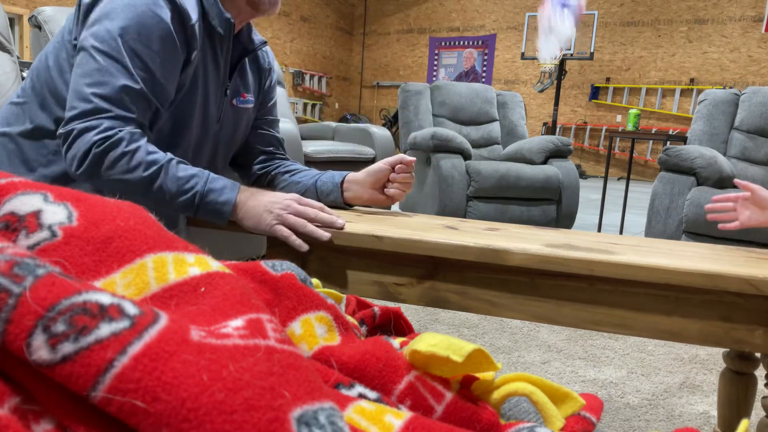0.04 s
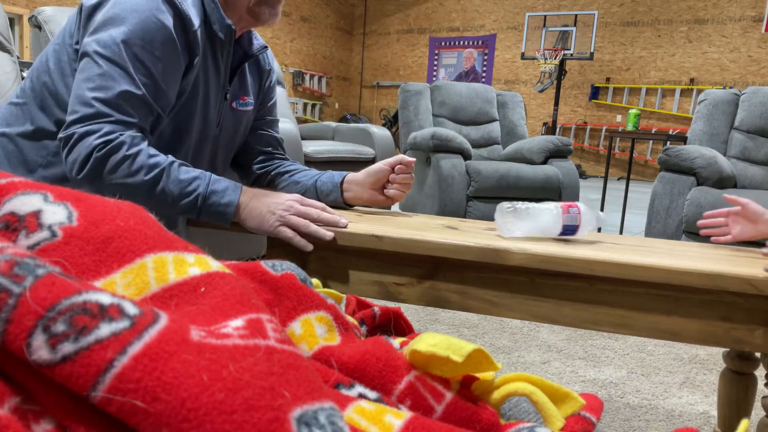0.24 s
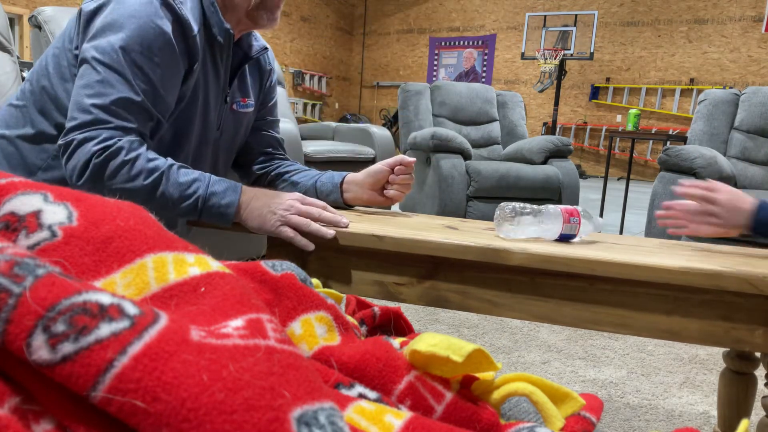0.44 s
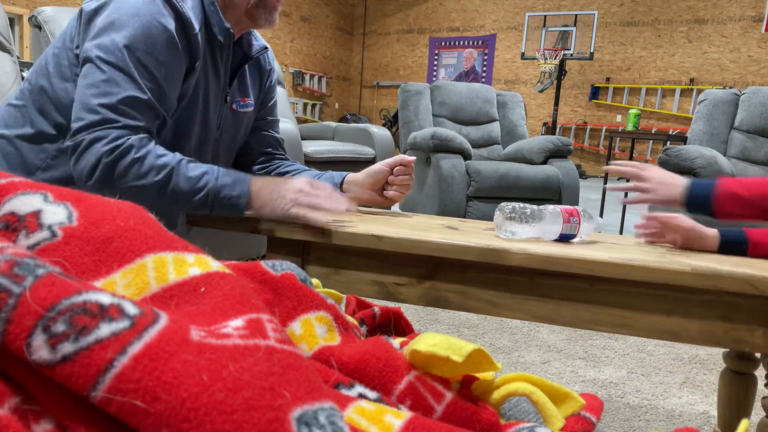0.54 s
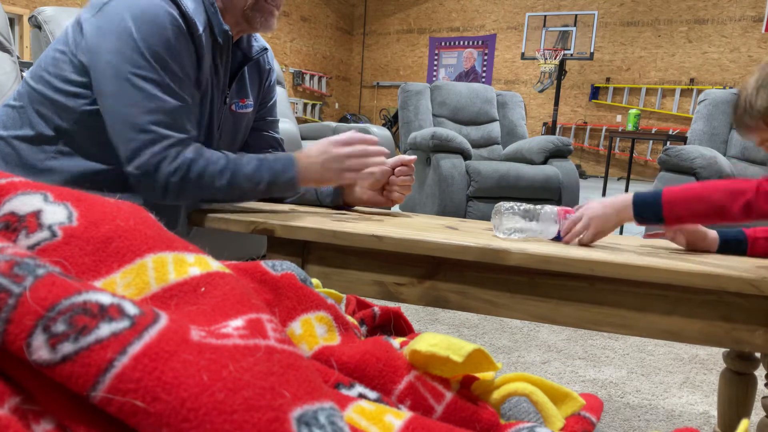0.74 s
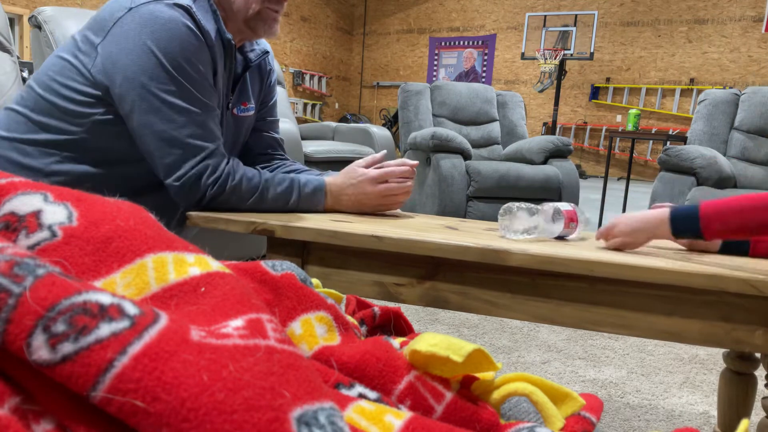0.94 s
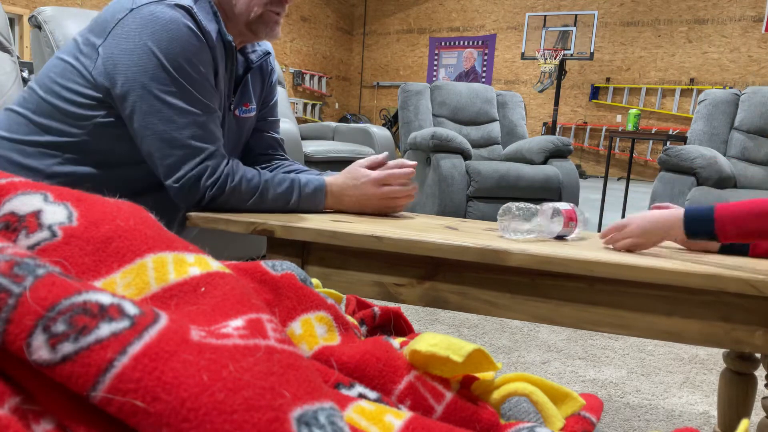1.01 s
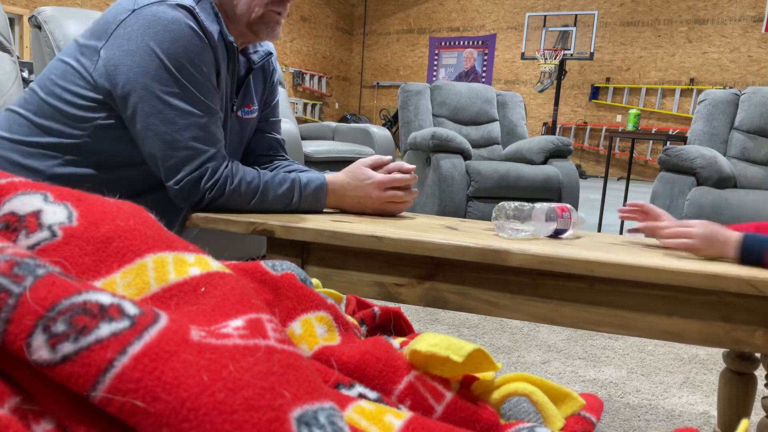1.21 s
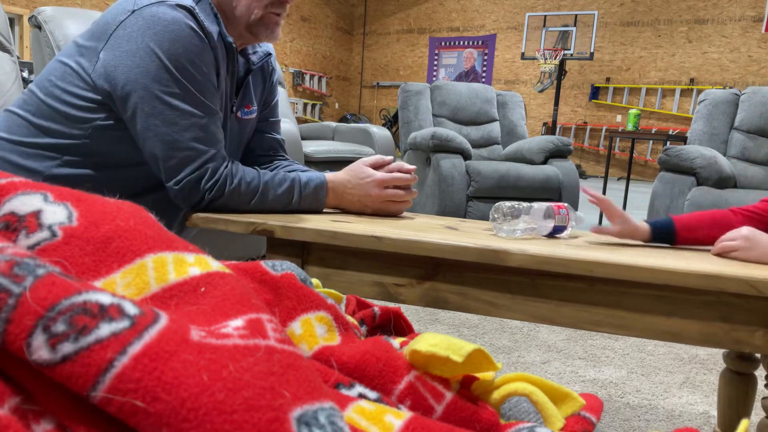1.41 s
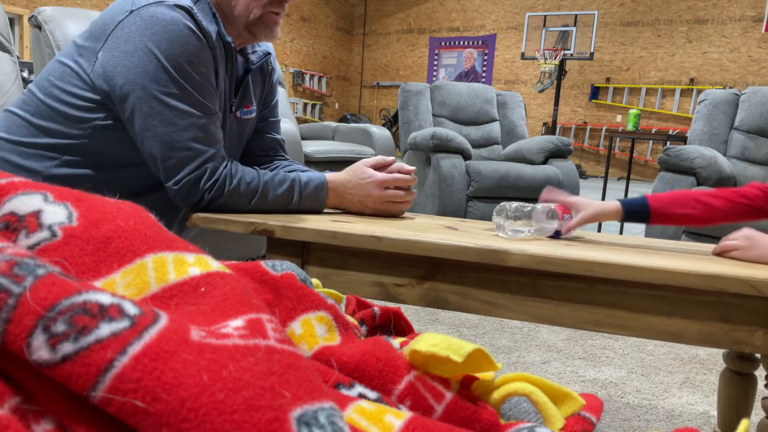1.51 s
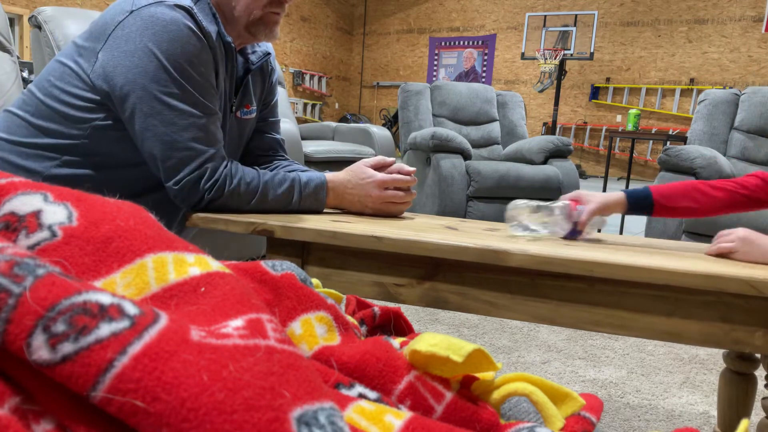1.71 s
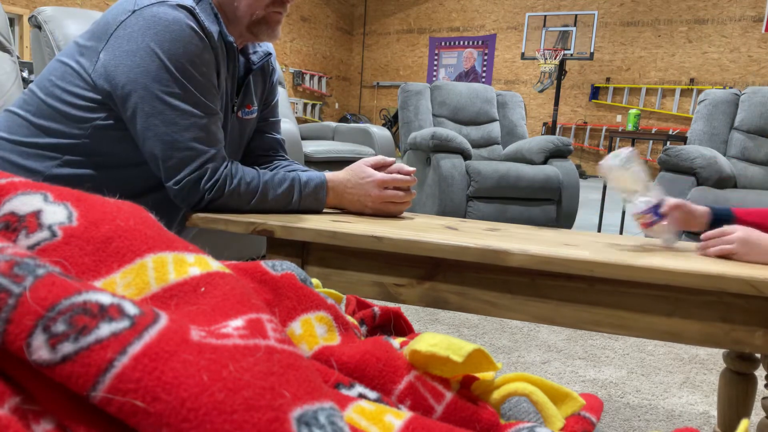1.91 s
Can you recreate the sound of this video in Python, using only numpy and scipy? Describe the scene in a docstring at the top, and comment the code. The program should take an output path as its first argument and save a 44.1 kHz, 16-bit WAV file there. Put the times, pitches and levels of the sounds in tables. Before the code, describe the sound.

A thin plastic bottle lands on a wooden table with a sharp hollow knock at 0.24 seconds, echoing through a large hard-walled room. A soft hand thud comes at 0.6, light crackles from 0.78 to 0.85, and a bright clack at 0.92. A small click with a faint thud follows at 1.26, then quick gripping crackles from 1.65 to 1.75 and faint ticks near 1.94, over quiet hush.

```python
"""Plastic bottle on a wooden table

A thin plastic bottle lands on its side on a wooden table in a large, hard-walled room, a couple of metres
from a phone. A hand then grips it, sets it down and picks it up: the shell crackles and knocks.
Each contact rings decaying modes of shell, body, hollow and table top; soft hand thuds ring low modes.
Walls answer with clear echoes and a long tail of shaped noise, over a quiet steady hush."""
import sys
import numpy as np
from scipy import signal
from scipy.fft import rfft, irfft
from scipy.io import wavfile
from scipy.ndimage import uniform_filter1d

SR = 44100
rng = np.random.default_rng(int(sys.argv[2]) if len(sys.argv) > 2 else 0)


def master_out(mix):
    """Clip the mix to full scale and print it as 16-bit PCM to the path in sys.argv[1]."""
    frames = np.transpose(np.atleast_2d(mix))
    ceiling = np.clip(frames, -1, 1)
    pcm = np.round(ceiling * 32767).astype(np.int16)
    wavfile.write(sys.argv[1], SR, pcm)


def boost(x):
    """Linear amplitude factor 10**(x/20) for a level x in decibels (scalar or array-like)."""
    u = np.asarray(x, float) / 20
    return 10 ** u


N = 85995
LEAD = SR // 2  # samples computed ahead of the start, so that an earlier crackle can leave its tail

# Quiet hush of the room. Each row: frequency in Hz, relative spectral level in dB.
AIR_SPECTRUM = [(24, -17.5), (45, 8), (80, 7.5), (170, -5), (600, -6.5), (1500, -7), (4500, -12.5),
                (10000, -22), (16000, -35)]
# Diffuse room tail. Each row: frequency in Hz, 60 dB decay time in s, relative level in dB.
TAIL = [(86, 1.77, -14.5), (161, 1.5, -5), (335, 1.41, -0.5), (580, 1.81, -1), (1110, 2.02, -4),
        (2000, 1.58, -1), (3140, 1.41, 2.5), (4850, 1.18, 3), (8000, 0.81, 2.5), (10900, 0.67, -4),
        (15000, 0.57, 4.5), (16300, .4, -8)]
# Standing waves of the room: faint decaying tones within the tail.
# Each row: frequency in Hz, relative level in dB, 60 dB decay time in s.
STANDING_WAVES = [(396.4, -21, .8), (401, -23, .8), (209, -24, .9), (1015, -27, 1.2)]
# Wall echoes. Each row: delay in s, level before the echo band-pass in dB, smear in s.
ECHOES = [(.0102, -17, .001), (.0244, -7, .002), (.054, -15, .001), (.081, -15, .0015)]
# Soft thuds of a hand on the table. Each row: start in s, level in dB, pitch in Hz, 60 dB decay time in s.
HAND_THUDS = [(0.614, -34, 134.8, 0.082), (1.262, -45, 110, 0.073), (1.563, -55, 104.7, 0.49)]
# Modes of the table top. Each row: frequency in Hz, relative level in dB, 60 dB decay time in s.
TABLE_TOP = [(101.3, -13, 0.099), (126.7, -13, 0.067), (211.5, -14, 0.15), (399, -1.5, 0.066),
             (447, 2.5, 0.034), (313, -6.5, 0.037), (560, -8, 0.053)]
# Modes of the hollow knock. Each row: multiple of the knock pitch, relative level in dB, 60 dB decay time in s.
KNOCK = [(.8, -6, 0.011), (0.998, -1.5, 0.018), (1.242, -8, 0.011)]
# Modes of the bottle body. Each row: multiple of the body pitch, relative level in dB, 60 dB decay time in s.
BODY = [(.84, -3.5, 0.0063), (1, 2, 0.0087), (1.16, -7, 0.0048), (1.42, -7, 0.0035), (1.7, -12.5, 0.0054)]
# Modes of the thin shell. Each row: frequency in Hz, relative level in dB, 60 dB decay time in s.
SHELL = [(3500, -8, .004), (4150, -7, .004), (4800, -4, .0045), (5900, -4, .0035), (6900, -3, .0035),
         (7800, -2, .004), (8700, -2, .004), (9700, -1, .0045), (10600, -2, .004), (11800, -4, .003),
         (13100, -7, .003), (14600, -9, .003), (15800, -12, .002)]
# Contacts of the bottle; grip and tilt shift the last two columns. Each row: start in s, shell treble level
# in dB, body level in dB, knock level in dB, table top level in dB, buckling length in s (at least 0.1 ms
# is used), brightest pitch in Hz, energy to the room over that to the phone in dB, body pitch in Hz,
# knock pitch in Hz.
CONTACTS = [(.2367, -17, -20.5, -13.5, -14, 0.0056, 8440, 0, 2096, 992),
            (.2403, -23.5, -24.5, -26, -58, 0.01, 9700, -10, 1750, 910),
            (.7827, -26.5, -41.5, -43, -70, 0.0077, 12400, 1.5, 2050, 1100),
            (.8036, -31, -36, -43, -60, 0.0045, 6040, -6, 2270, 1100),
            (.8238, -33, -38.5, -46.5, -48, 0.0043, 8000, -16, 1820, 1310),
            (.8537, -29.5, -39.5, -57, -63, 0.0033, 7200, 3, 2470, 940),
            (.9152, -15, -22, -27, -31, 0.0029, 10100, -2.5, 2026, 1090),
            (1.256, -37, -43, -45, -49, 0.0062, 6100, -3.5, 2000, 1000),
            (1.2607, -21.5, -29, -42, -60, 0.00043, 8900, -2, 1950, 946),
            (1.2628, -26.5, -37, -57, -53, 0.002, 4700, -3.5, 2400, 970),
            (1.6483, -25.5, -41.5, -71, -72, 0.00055, 8250, -18, 1930, 810),
            (1.65, -24.5, -38.5, -52, -62.5, 0.0015, 9200, 3, 2500, 803),
            (1.6782, -22.5, -37, -41, -61, 0.0033, 6800, 3, 2000, 1080),
            (1.6952, -33, -30.5, -42, -66, 0.00086, 8400, -8, 1920, 956),
            (1.7115, -44, -40, -48, -68, 0.001, 4000, -6, 3280, 940),
            (1.7192, -32.5, -38, -51, -51, 0.0018, 8000, 3.5, 1500, 880),
            (1.7485, -26.5, -33, -43, -52, 0.0015, 7960, -2, 2170, 850),
            (1.928, -50, -54, -61, -59, 0.0048, 10400, -5, 2000, 1010),
            (1.9448, -36, -61, -66, -58, 0.0041, 11200, 0, 2000, 1000)]
# A crackle shortly before the start, heard only as its tail. One row: the columns above after the time.
EARLIER_CONTACT = (-26, -30, -45.5, -58, -0.02, 4502, -2.5, 1792, 998.5)


def table_at(table, hz, column):
    """Read a column of a frequency table, interpolated on a log frequency axis."""
    rows = np.array(table, float)
    return np.interp(np.log(np.maximum(hz, 1)), np.log(rows[:, 0]), rows[:, column])


def ring(modes, extra_db, size=8192):
    """Impulse response of a set of decaying modes; neighbouring rows swing against each other."""
    hz, db, t60 = np.array(modes, float).T
    t = np.arange(size)[:, None] / SR
    gain = boost(db + extra_db) * (-1) ** np.arange(len(hz))
    decay = np.exp(-np.log(1000) * t / t60)
    return (gain * decay * np.sin(2 * np.pi * hz * t)).sum(axis=1)


def push(length_s):
    """Half-sine contact force."""
    t = (np.arange(SR // 50) + .5) / SR
    return np.sin(np.pi * np.clip(t / max(length_s, 2 / SR), 0, 1))


def add(out, x, at_s):
    """Mix a sound in at a given time."""
    i = int(round(at_s * SR)) + LEAD
    out[:, i:i + x.shape[1]] += x[:, :out.shape[1] - i]


def strike(out, at_s, force, even_force, modes, extra_db, db, blur_hz, room_db=0):
    """Ring an object: row 0 goes to the phone with db as its loudest 4 ms, row 1 feeds the room tail."""
    response = ring(modes, extra_db)
    size = len(response)
    near = signal.fftconvolve(force, response)[:size]
    far = signal.fftconvolve(even_force, response)[:size]
    # summed over all directions the resonances blur
    power = uniform_filter1d(abs(rfft(far)) ** 2, size=int(blur_hz * size / SR))
    feed = irfft(np.sqrt(np.maximum(power, 0)))
    feed = np.roll(feed, 256)  # the feed peaks 256 samples late
    feed *= boost(room_db) * np.sqrt(np.sum(near ** 2) / np.sum(feed ** 2))
    loudest = np.sqrt(uniform_filter1d(near ** 2, size=180).max())
    add(out, np.array([near, feed]) * boost(db) / loudest, at_s)


def air():
    """Quiet steady hush of the room: noise shaped in frequency."""
    level_db = -59  # rms
    hz = np.fft.rfftfreq(N, 1 / SR)
    x = irfft(rfft(rng.standard_normal(N)) * boost(table_at(AIR_SPECTRUM, hz, 1)), N)
    return x * boost(level_db) / x.std()


def room_tail(size):
    """Dense reflections as third-octave noise bands with their own decays, plus faint standing waves."""
    start_s, build_s, gain_db = 0.0012, 0.017, -38.5
    t, hz = np.arange(size) / SR, np.fft.rfftfreq(size, 1 / SR)
    noise, tail = rfft(rng.standard_normal(size)), 0
    for centre_hz in 40 * 2 ** np.arange(0, 9, 1 / 3):
        octaves = np.log2(np.maximum(hz, 1) / centre_hz)
        band = np.cos(np.pi / 2 * np.clip(3 * octaves, -1, 1)) ** 2
        decay_db = -60 * t / table_at(TAIL, centre_hz, 1)
        tail = tail + irfft(noise * band) * boost(table_at(TAIL, centre_hz, 2) + decay_db)
    tail = tail + ring(STANDING_WAVES, 0, size=size)
    build = 1 - np.exp(-np.maximum(t - start_s, 0) / build_s)
    return tail * build * boost(gain_db)


def wall_echoes(size):
    """Walls return a few delayed copies, each smeared by a short noise decay and band-limited."""
    spread, low_hz, top_hz = .3, 2400, 11770  # spread: noise share against the first sample
    echoes, t = np.zeros(size), np.arange(512) / SR
    for delay_s, db, smear_s in ECHOES:
        i = int(delay_s * SR)
        echo = spread * rng.standard_normal(512) * np.exp(-t / smear_s)
        echo[0] = 1
        echoes[i:i + 512] += boost(db) * echo / np.sqrt(np.sum(echo ** 2))
    band = signal.butter(1, [low_hz, top_hz], "band", fs=SR, output="sos")
    return signal.sosfilt(band, echoes)


def room():
    """Impulse responses: row 0 is the direct path with wall echoes, row 1 the diffuse tail."""
    size = 2 * SR
    tail = room_tail(size)
    direct = wall_echoes(size)
    direct[0] += 1
    return np.array([direct, tail])


def hand():
    """Soft flesh on wood: a gentle push rings a low mode and a weaker, shorter one above it."""
    out, slap = np.zeros((2, N + LEAD)), push(.004)
    for at_s, db, hz, t60 in HAND_THUDS:
        modes = [(hz, 0, t60), (1.17 * hz, -6, t60 / 2)]
        strike(out, at_s, slap, slap, modes, 0, db, blur_hz=60)
    return out


def buckling(length_s):
    """The thin wall snaps in and out: one click, then random smaller snaps that die away."""
    snaps_per_s, snap_db, scatter_db = 4000, -5, 4  # levels against the first click, before the dying away
    t = np.arange(1024) / SR
    present = rng.random(1024) < snaps_per_s / SR
    sign, scatter = rng.standard_normal((2, 1024))
    snaps = present * np.sign(sign) * boost(snap_db + scatter_db * scatter)
    snaps = snaps * np.exp(-(t / max(length_s, 1e-4)) ** 1.5)
    snaps[0] = 1
    return snaps


def vary_shell_pitch(draws):
    """Shell modes are shifted at random for each contact, at most 3 %."""
    modes = np.array(SHELL)
    modes[:, 0] *= 1 + .03 * np.tanh(draws)
    return modes


def bottle():
    """Contacts ring shell and body by a click and snaps, hollow and table top by short pushes."""
    bright_db, bright_octaves = 5, .3  # relative lift of shell modes around the brightest pitch, and its width
    out = np.zeros((2, N + LEAD))
    click, tap, blow = signal.unit_impulse(1024), push(.0003), push(.0008)
    for contact in list(CONTACTS) + [(-.11, *EARLIER_CONTACT)]:
        at_s, shell_db, body_db, knock_db, table_db, length_s, bright_hz, room_db, body_hz, knock_hz = contact
        snaps = buckling(length_s)
        # each contact excites the modes a little differently: random level offsets, spread 2 dB (table 1 dB)
        vary = rng.standard_normal((4, 16))
        shell_vary, body_vary = 2 * vary[0, :len(SHELL)], 2 * vary[1, :len(BODY)]
        table_vary, knock_vary = vary[2, :len(TABLE_TOP)], 2 * vary[3, :len(KNOCK)]
        octaves = np.log2(np.array(SHELL)[:, 0] / bright_hz)
        shell_lift = bright_db * np.exp(-(octaves / bright_octaves) ** 2) + shell_vary
        shell = vary_shell_pitch(vary[2, :len(SHELL)][::-1])
        body = np.array(BODY) * [body_hz, 1, 1]
        hollow = np.array(KNOCK) * [knock_hz, 1, 1]
        strike(out, at_s, snaps, click, shell, shell_lift, shell_db, 2500, room_db)
        strike(out, at_s, snaps, click, body, body_vary, body_db, 900, room_db)
        strike(out, at_s, tap, tap, hollow, knock_vary, knock_db, 400, room_db)
        strike(out, at_s, blow, blow, TABLE_TOP, table_vary, table_db, 120, room_db)
    return out


def scene():
    """Bottle and hand heard through the room, over its hush."""
    paths = signal.fftconvolve(bottle() + hand(), room(), axes=1)
    wet = paths.sum(axis=0)[LEAD:LEAD + N]
    return (wet + air())[None]


def roll_off(x):
    """The treble ends steeply here."""
    return signal.sosfilt(signal.butter(12, 17080, fs=SR, output="sos"), x)


def record(dry):
    """The phone drops the deep bass below about 90 Hz."""
    high_pass = signal.butter(3, 90, "high", fs=SR, output="sos")
    return roll_off(signal.sosfilt(high_pass, dry))


dry = scene()
out = record(dry)
master_out(out)
```